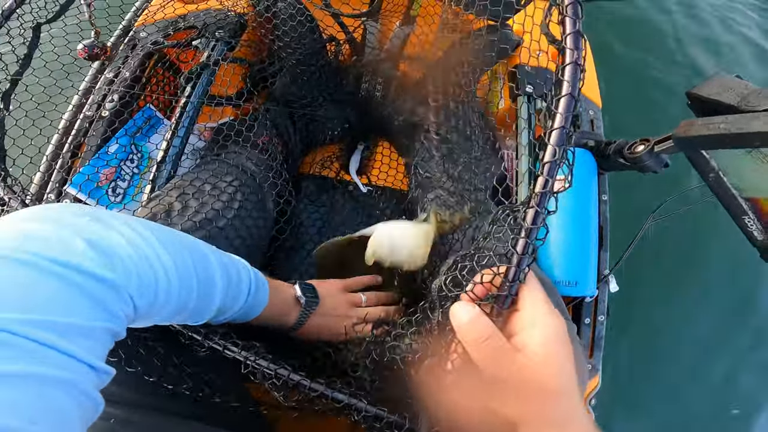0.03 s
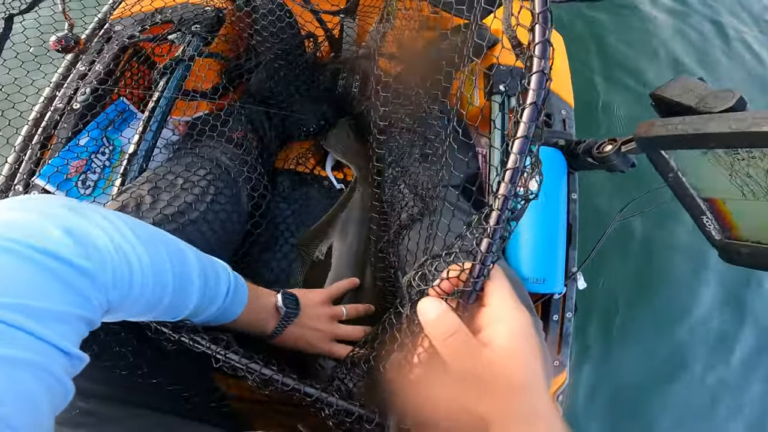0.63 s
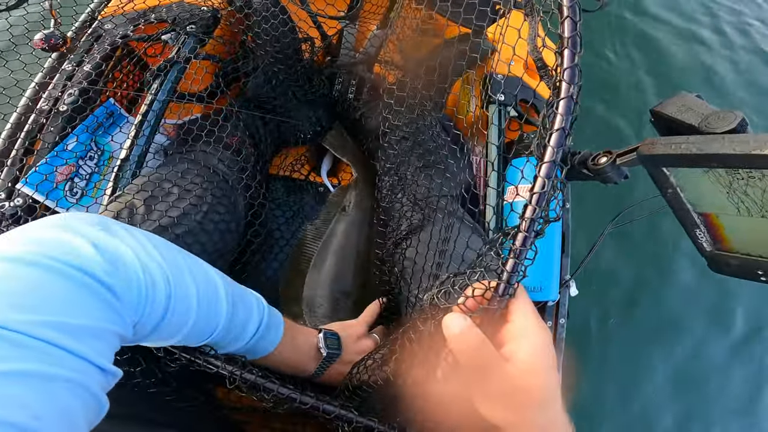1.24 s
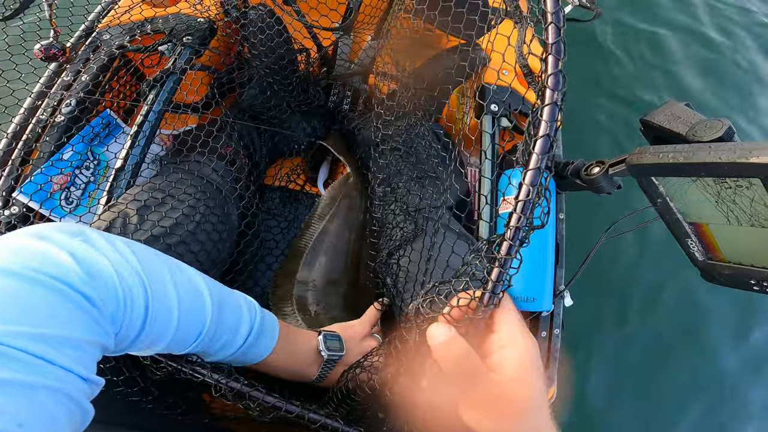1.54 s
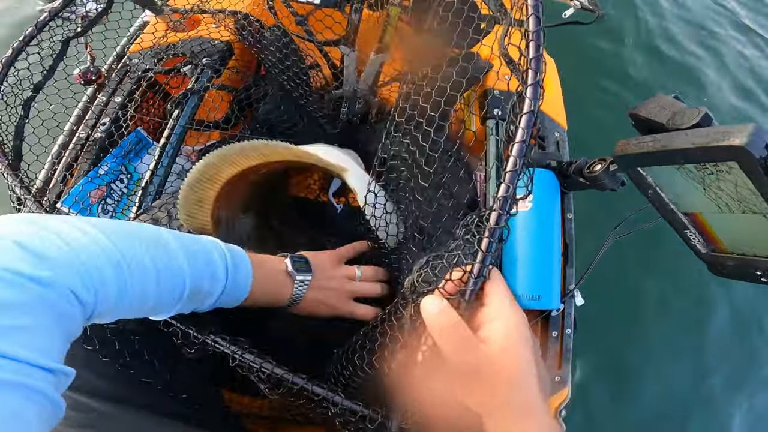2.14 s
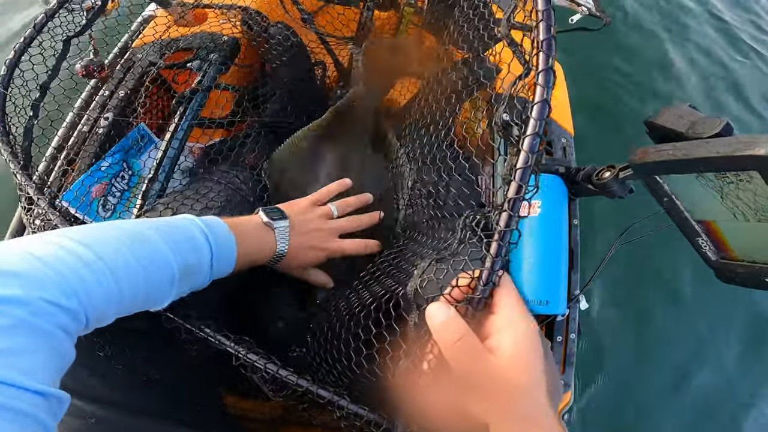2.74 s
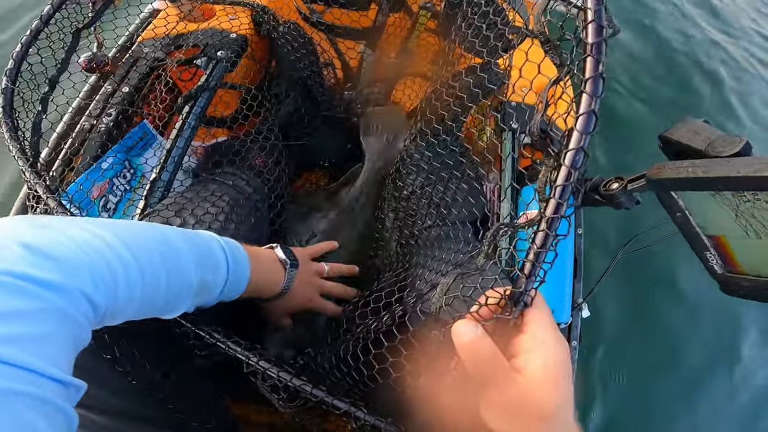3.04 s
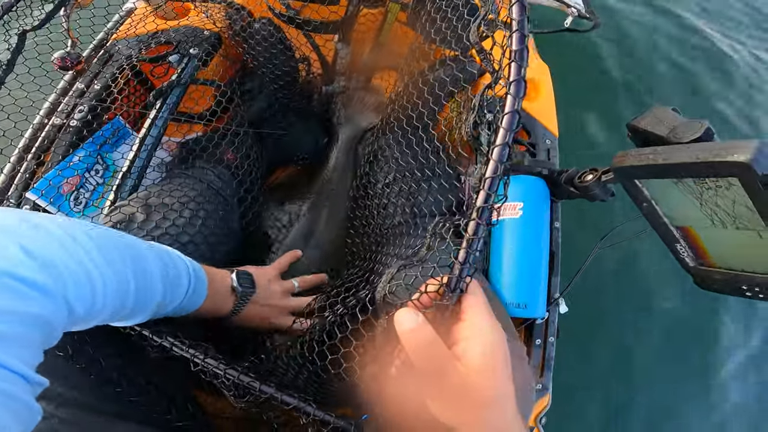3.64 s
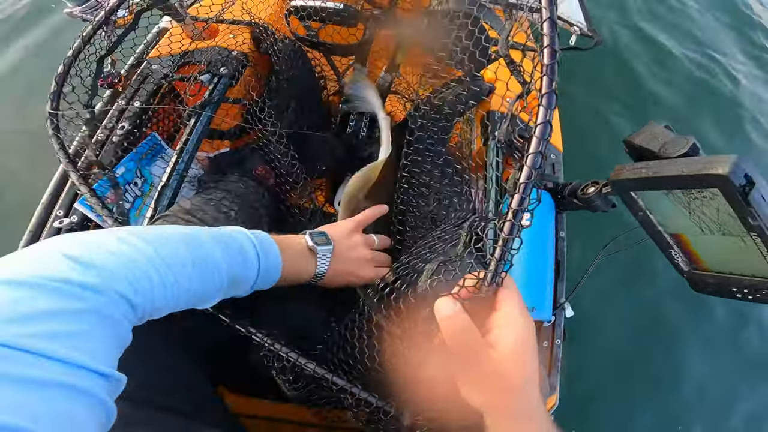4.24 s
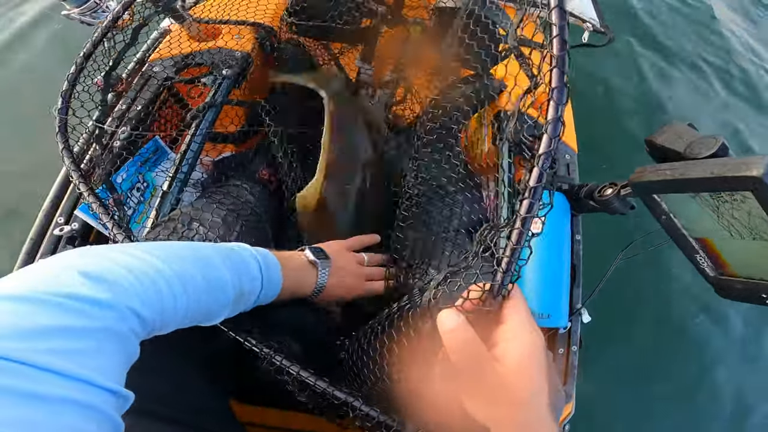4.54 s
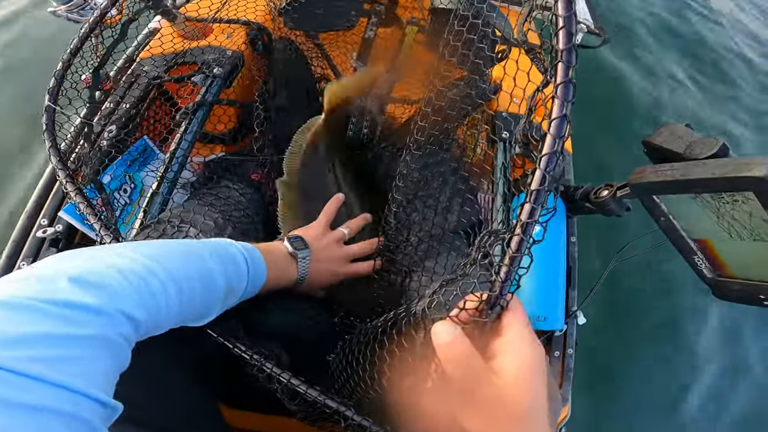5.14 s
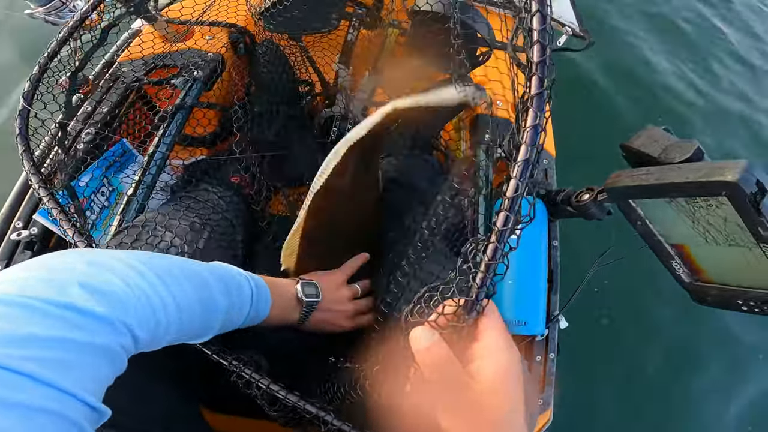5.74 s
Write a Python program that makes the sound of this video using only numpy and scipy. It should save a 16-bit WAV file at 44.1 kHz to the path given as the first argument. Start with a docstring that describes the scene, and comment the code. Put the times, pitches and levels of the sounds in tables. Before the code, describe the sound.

A large wet fish thrashes in a net on a plastic kayak, slapping and thumping in bouts over a low engine hum.

```python
"""On the deck of a plastic kayak, an arm's length away, a big flatfish thrashes in a landing net.
Its wet skin slaps and throws spray, air pockets in the slime resonate as pops and squelches, and its
body drives the damped modes of the hollow hull. The dragged mesh rustles by stick-slip friction.
Underneath, an engine hums across the water, with a low wash around the boat and a light breeze."""
import sys
import numpy as np
from scipy import signal
from scipy.fft import rfft, irfft
from scipy.io import wavfile
from scipy.ndimage import map_coordinates

SR = 44100
rng = np.random.default_rng(int(sys.argv[2]) if len(sys.argv) > 2 else 0)


def to_wav(s):
    """Save 16-bit WAV."""
    ch = np.atleast_2d(s).T  # columns
    pcm = np.round(np.clip(ch, -1, 1) * 32767)  # PCM
    wavfile.write(sys.argv[1], SR, pcm.astype(np.int16))


N = 255339
T = np.arange(N) / SR

# Gusts on the microphone ports. Each row: crest in seconds, half-width in seconds, level in dB.
GUSTS = [(0.288, 0.73, -34), (4.313, 0.97, -45), (5.8, 0.37, -35)]
# Spectrum of the wash around the hull. Each row: frequency in Hz, relative level in dB.
WASH_SPECTRUM = [(12, -14), (22, 2), (60, 4), (80, 1), (120, 0.5), (160, -2.5), (205, -3), (285, -13.5),
                 (350, -19), (550, -26.5), (1000, -31.5), (2000, -47.5), (5000, -82.5), (9000, -73.5),
                 (15000, -80)]
# Course of the lapping. Each row: time in seconds, relative level in dB.
LAPPING_LEVELS = [(0.0, -46.5), (0.6, -62), (1.45, -61), (2.06, -39.5), (2.58, -60), (3.87, -47.5),
                  (4.22, -38), (5.22, -62), (5.79, -40)]
# Partials of the engine. Each row: frequency in Hz, rms level in dB before waver and swell.
ENGINE_PARTIALS = [(92.8, -35), (187.5, -40), (211, -43.5), (273, -51), (370, -61), (398, -64), (457, -59),
                   (492, -67), (523, -63), (565, -68), (665, -68)]
# Swell of the upper partials: crest in seconds, half-width in seconds, gain in dB.
ENGINE_SWELL = (3.6, 0.43, 7.4)
# Glides of skin under the mesh. Each row: crest in seconds, half-width in seconds, level in dB.
GLIDES = [(0.81, 0.091, -62), (3.86, 0.23, -54)]
# Slow sliding of the fish in the mesh. Each row: time in seconds, level in dB.
SLIDING_LEVELS = [(0.0, -43.5), (0.31, -59), (0.53, -62), (1.16, -73.5), (1.4, -68.5), (1.61, -57.5),
                  (1.8, -58.5), (1.95, -35.5), (2.11, -57.5), (2.35, -46.5), (2.55, -59.5), (2.93, -53.5),
                  (3.08, -75), (3.4, -69.5), (3.6, -60.5), (3.9, -57), (4.03, -44), (4.18, -41.5),
                  (4.71, -49.5), (4.89, -56), (5.3, -62), (5.55, -52), (5.79, -37.5)]
# Hauls on the mesh. Each row: end of the rise in seconds, hold in seconds, rustle in dB, scrape in dB.
SWISHES = [(0.031, 0.045, -36.5, -43.5), (0.149, 0.028, -36, -35), (.25, 0.0084, -44, -56),
           (.42, 0.082, -54, -58), (1.501, 0.013, -65, -44.5), (1.751, 0.089, -80, -39.5),
           (1.885, 0.03, -47, -59), (1.99, 0.091, -47, -37.5), (2.203, 0.032, -42, -36.5),
           (2.434, 0.029, -43, -32.5), (2.743, 0.051, -51.5, -53), (3.556, 0.035, -60, -48.5),
           (3.635, 0.034, -62, -43), (4.022, 0.027, -32, -27), (4.124, 0.012, -31, -49),
           (4.29, 0.064, -37.5, -38.5), (4.48, 0.045, -38, -30.5), (4.6, .1, -36.5, -37.5),
           (4.785, 0.044, -45, -43), (4.951, 0.037, -47.5, -51), (5.417, 0.0038, -58, -47),
           (5.489, 0.027, -47, -38.5), (5.629, 0.0096, -38, -36), (5.665, 0.091, -43, -40.5)]
# Spectra of gliding skin, mesh, spray and flesh. Each row: frequency in Hz, relative level in dB.
GLIDE_SPECTRUM = [(600, -5.5), (1600, 6.5), (2600, -12), (3500, 1.5), (5200, -1), (7000, -24), (9000, -24),
                  (12500, -27), (15000, -44.5)]
MESH_SPECTRUM = [(820, -18.5), (1250, 11), (1600, 2), (2100, 7), (2720, 9.5), (3570, 0), (5670, -0.5),
                 (7440, -7), (8910, -15), (10500, -10.5), (13700, -26.5), (15500, -41)]
SPRAY_SPECTRUM = [(710, -5), (1250, -8), (1600, -9.5), (2050, -6.5), (2510, -7.5), (4530, -8.5), (5790, -4),
                  (6370, -9), (7810, -7), (8330, -15), (10300, -12), (13800, -27), (15500, -40.5)]
FLESH_SPECTRUM = [(200, -20.5), (400, 3.5), (580, -1), (750, 0.5), (1100, -2), (1500, -13.5), (2500, -42)]
# Squelches of slime. Each row: start in seconds, length in seconds, centre pitch in Hz, peak in dB.
SQUELCHES = [(0.247, 0.046, 1064, -24), (0.298, .02, 2190, -32), (0.411, 0.049, 1490, -27.5),
             (0.459, 0.024, 1063, -27.5), (0.623, 0.016, 1155, -41.5), (1.746, 0.047, 1100, -31),
             (1.78, 0.018, 862, -21), (3.637, 0.033, 924, -32.5), (4.089, 0.019, 1230, -27),
             (4.753, 0.031, 1210, -29), (4.867, 0.027, 1110, -28.5), (5.022, 0.017, 1547, -32.5),
             (5.046, 0.026, 945, -31), (5.197, 0.033, 1350, -31), (5.245, 0.023, 1150, -29.5),
             (5.412, 0.017, 825, -25.5), (5.452, 0.022, 1222, -28)]
# Bubbles popping in the slime. Each row: start in seconds, pitch in Hz, peak in dB, t60 in seconds.
POPS = [(.035, 750, -19, 0.014), (0.141, 2490, -11.5, 0.0079), (.142, 3670, -13, 0.0056),
        (0.489, 6100, -23.5, 0.00092), (.615, 3600, -50, 0.0015), (.634, 2600, -54, 0.0027),
        (.808, 4240, -48.5, 0.0015), (.92, 4000, -50, 0.0019), (1.288, 3050, -47.5, 0.008),
        (1.323, 5230, -48.5, 0.0038), (1.359, 3000, -41.5, 0.0039), (1.455, 3040, -41, .011),
        (1.49, 2880, -49, .008), (1.504, 1030, -37.5, 0.012), (1.53, 3480, -48, .007),
        (1.668, 4700, -36.5, 0.0036), (1.792, 2700, -30, 0.0079), (1.874, 814, -18, 0.017),
        (1.973, 1150, -13.5, 0.012), (2.257, 2610, -15.5, 0.0032), (2.259, 780, -14.5, 0.029),
        (2.293, 2600, -31, .007), (2.424, 3960, -19, 0.0089), (2.52, 1230, -22, 0.0089),
        (2.521, 2380, -21, 0.0069), (2.839, 1090, -22, 0.015), (2.847, 2720, -15.5, 0.0098),
        (2.848, 3210, -17, 0.012), (2.947, 1270, -24, 0.012), (3.023, 2110, -40, 0.013),
        (3.076, 5940, -34, 0.01), (3.601, 3100, -47, .007), (3.727, 980, -27.5, .022),
        (4.010, 2600, -21.5, 0.016), (4.012, 1940, -16.5, 0.018), (4.041, 795, -26, 0.06),
        (4.125, 766, -15, 0.034), (4.165, 2400, -31, .01), (4.201, 930, -18.5, 0.0078),
        (4.233, 800, -24, .025), (4.274, 704, -29, .03), (4.508, 1140, -23, 0.044), (4.579, 1210, -18, .04),
        (4.591, 1970, -21.5, .03), (4.594, 795, -31, .025), (4.641, 1650, -26, .014),
        (4.659, 1770, -25, .014), (4.82, 1375, -23.5, 0.018), (4.936, 1410, -27.5, 0.0071),
        (5.133, 535, -22, 0.023), (5.139, 4030, -26.5, .002), (5.338, 2680, -34, .004),
        (5.63, 5400, -21.5, 0.0045), (5.631, 1120, -29, 0.021), (5.657, 1050, -24, .03),
        (5.677, 850, -33, .025), (5.707, 1400, -21, 0.0098), (5.749, 2590, -29, .014)]
# Lowest mode of the deck: frequency in Hz, t60 (the time to decay by 60 dB) in seconds.
DECK_MODE = (73.4, 0.26)
# Modes of the hull. Each row: frequency in Hz, t60 in seconds, relative level in dB.
HULL_MODES = [(128.6, 0.29, -0.5), (188.6, 0.027, 0), (258, 0.027, 7.5), (313, 0.039, 2), (382.6, 0.034, 2),
              (472, 0.053, 1), (534, 0.01, -8.5), (768, 0.019, 2.5), (1013, 0.018, -21),
              (1180, 0.018, -5.5)]
# Blows of the body. Each row: start in seconds, boom peak in dB, knock peak in dB, pitch of the struck
# spot in Hz, contact time in seconds, t60 of the damping by the body in seconds.
THUMPS = [(0.034, -21, -16, 720, 0.0025, 0.12), (0.146, -8.5, -18, 131, 0.0019, .4),
          (0.171, -45, -16.5, 328, 0.0018, 0.14), (0.249, -18, -14.5, 133, 0.0028, 0.16),
          (0.332, -22, -18.5, 298, 0.0019, 0.08), (0.57, -28, -15.5, 268, 0.0021, 0.074),
          (1.8752, -45, -7, 526, 0.0016, 0.057), (1.885, -23, -11.5, 258, 0.0018, 0.076),
          (1.978, -10.5, 3, 330, 0.0016, 0.16), (2, -30, -2.5, 480, 0.00094, 0.14),
          (2.191, -11.5, -9.5, 292, 0.0031, 0.19), (2.2617, -36, -4.5, 245, 0.0022, 0.069),
          (2.4274, -13.5, -3.5, 201, 0.0031, 0.089), (2.454, -16.5, -7.5, 149, 0.0027, 0.21),
          (2.544, -38, -16, 338, 0.0014, 0.17), (2.837, -15, -10, 129, 0.003, 0.17),
          (2.852, -40, -26, 340, 0.002, 0.14), (2.909, -14.5, -23.5, 132, 0.0046, 0.35),
          (4.023, -50, -8.5, 164, 0.0029, 0.055), (4.137, -12, -6, 300, 0.0013, .04),
          (4.205, -12.5, -2.5, 203, 0.0017, 0.11), (4.218, -38, -6, 300, 0.0018, 0.091),
          (4.276, -28, -11, 345, 0.0012, 0.17), (4.4652, -15, 1, 201, 0.0026, 0.15),
          (4.473, -30, -6, 430, 0.0014, .09), (4.5, -45, -16.5, 240, 0.0022, 0.1),
          (4.593, -27, -21, 200, 0.0022, 0.14), (4.6481, -11.5, -1.5, 240, 0.0038, 0.12),
          (4.66, -43, -14, 524, 0.00088, 0.1), (4.939, -25, -24, 140, 0.0032, 0.27),
          (5.132, -52, -15, 340, 0.001, .4), (5.452, -20, -13.5, 486, 0.00094, 0.13),
          (5.655, -28, -13.5, 150, 0.0019, .15), (5.7124, -14.5, -1, 170, 0.0028, 0.15)]
# Slaps of fins and tail. Each row: time in seconds, level in dB, smack relative to the spray in dB,
# gain of the top treble in dB, t60 in seconds, time constant of the rise in seconds.
SLAPS = [(.022, -28.5, 0, -14, 0.042, 0.0052), (.036, -25.5, 0, -1, 0.054, 0.0022),
         (.048, -28, -30, -3, 0.074, 0.0046), (.143, -16, -39, -9.5, 0.031, 0.0046),
         (0.259, -37, -8, -6, 0.14, 0.004), (.31, -43.5, -23.5, -33, 0.21, .002),
         (0.434, -54, -16, -25, 0.065, 0.0046), (.541, -49, 5.5, -8, 0.1, 0.0024),
         (1.457, -52, -5, -7, 0.039, 0.0011), (1.507, -54, -1, -2, 0.028, .002),
         (1.608, -48.5, 0, -12, .02, .003), (1.668, -50.5, 8, -9, 0.081, 0.0047),
         (1.782, -34, -6, -13, 0.083, 0.004), (1.793, -35, 3, -12, 0.058, 0.0018),
         (1.844, -36.5, -6, -20, 0.077, 0.014), (1.876, -23, 4, -16, 0.04, 0.0065),
         (1.917, -36, 6, 0, 0.036, 0.0025), (1.975, -31.5, 14.5, -34, 0.13, 0.0019),
         (1.995, -24.5, -24, -18, 0.21, 0.0054), (2.109, -38.5, -10, -20, 0.086, 0.0052),
         (2.193, -43, 13, -19, 0.045, .0008), (2.259, -24, -12, -15.5, 0.022, 0.0077),
         (2.295, -34, -15, -20, 0.015, 0.0022), (2.321, -35, -18, -20, 0.009, .0008),
         (2.348, -37.5, 5.5, -17, .026, 0.0041), (2.385, -38.5, -5, -19, 0.02, 0.0023),
         (2.424, -22, -0.5, -16, 0.045, 0.0038), (2.519, -32.5, 4, -17, 0.037, 0.0027),
         (2.747, -40.5, -20, -12, .015, 0.0023), (2.762, -42, -14, -23, 0.054, 0.0033),
         (2.8382, -28.5, -32, -23, 0.073, 0.0036), (2.849, -31.5, -25, -13, 0.018, 0.0018),
         (2.908, -44, -10, -33, .04, .004), (2.9488, -29, -23, -32, 0.0086, 0.0016),
         (3.026, -43, 2.5, -18, 0.07, 0.0028), (3.075, -43.5, -35, -21.5, 0.068, 0.002),
         (3.56, -45.5, -3, -12.5, 0.013, 0.0011), (3.57, -49.5, -3, 0, .015, .001),
         (3.601, -49.5, -8, 0, .02, .001), (3.648, -49, 6, 8, 0.033, .002),
         (3.691, -47, 14.5, -9, 0.049, 0.0033), (4.0118, -22, -5, -9.5, 0.04, 0.0052),
         (4.025, -18.5, -27, -5, 0.021, 0.00053), (4.042, -32.5, 13, -18, 0.052, 0.00065),
         (4.067, -36, -17, 10, .012, .001), (4.128, -25, 8.5, -35, 0.052, 0.0099),
         (4.138, -21.5, -2, -7.5, 0.016, 0.0016), (4.166, -33.5, -8, -11, 0.034, .002),
         (4.216, -27, 4.5, -16, 0.038, .001), (4.234, -30, 4.5, -20, 0.037, 0.0017),
         (4.277, -16.5, -2, -5.5, 0.036, 0.0048), (4.291, -24.5, 1, -9, 0.095, 0.00092),
         (4.4622, -15.5, -4.5, -11, 0.022, 0.00075), (4.477, -25, -10, -18, 0.13, 0.007),
         (4.499, -25, -12, -31, 0.022, 0.0012), (4.511, -26, -8, -20, 0.018, 0.00072),
         (4.582, -24, -18, -7.5, 0.12, 0.0032), (4.596, -24.5, 0, -13, 0.016, .002),
         (4.642, -21, -8, -19, 0.035, 0.00055), (4.662, -26, -5, -19, 0.049, 0.0015),
         (4.68, -30, -2, -9, 0.053, 0.001), (4.766, -31, -3.5, -14, 0.036, 0.0033),
         (4.821, -27.5, -9, -14, 0.071, 0.0018), (4.881, -39, -18, -9, 0.047, 0.0014),
         (4.9387, -32.5, -28, -17, 0.016, 0.00056), (4.969, -31.5, -15, -9, 0.013, 0.0034),
         (5.035, -39.5, -7, -60, 0.063, 0.0022), (5.105, -39, -21, -24, 0.073, 0.0045),
         (5.14, -29.5, 5.5, -14, 0.049, 0.0032), (5.199, -32, 0.5, -11, 0.082, 0.0038),
         (5.252, -44, -11, -12, 0.051, 0.0016), (5.289, -42.5, -17, -17, 0.027, .001),
         (5.336, -46, -25, -20, .011, .0007), (5.396, -46, -15, -4, .02, .001),
         (5.458, -28.5, 4, -18, 0.037, 0.002), (5.515, -32.5, -4, -12, .025, 0.0028),
         (5.638, -20, -21, -4.5, 0.025, 0.0016), (5.6571, -23.5, -7, -6, 0.05, 0.0005),
         (5.678, -27.5, -16, -7, 0.14, 0.013), (5.737, -28, -26, -10, 0.2, 0.0022)]
# Left-right spread. Each row: frequency in Hz, side signal relative to mid in dB, before STEREO_WIDTH.
SIDE_SPECTRUM = [(100, -36), (250, -23), (900, -25), (1500, -11), (2500, -17), (7000, -18), (10000, -13),
                 (13000, -1)]
# Width of the stereo image. Each row: time in seconds, gain of the side signal in dB.
STEREO_WIDTH = [(0, 1), (.6, -2.5), (1.2, -17), (1.5, -27.5), (3.25, -32), (3.45, -4), (4.3, -1.5),
                (5.79, 2)]
# Spectra of wind, lapping, mesh hiss and settling flesh. Each row: frequency in Hz, relative level in dB.
WIND_SPECTRUM = [(15, -12), (35, 7.5), (70, 3.5), (150, 1.5), (400, -14.5), (1000, -34.5), (3000, -68.5)]
LAPPING_SPECTRUM = [(100, -28), (250, 5.5), (450, -4.5), (900, -24.5), (2500, -73)]
HISS_SPECTRUM = [(1150, 0), (1600, -7.5), (2500, -7), (4200, -5), (7000, -11.5), (12000, -19),
                 (15500, -43)]
SETTLING_SPECTRUM = [(60, -12), (200, 9), (500, 6), (1200, -11.5), (3000, -59.5)]


def undb(db):
    """Amplitude grows tenfold for every 20 dB."""
    return 10 ** (np.asarray(db) / 20)


def unit(x):
    """Normalisation to an rms of 1."""
    return x / np.sqrt(np.mean(x ** 2) + 1e-20)


def at_peak(x, db):
    """Normalisation to a peak level in dB."""
    return undb(db) * x / np.abs(x).max()


def add(track, start, x):
    """Superposition: x joins the track at start seconds."""
    i = int(start * SR)
    x = x[max(-i, 0):N - i]
    track[max(i, 0):i + len(x) + max(-i, 0)] += x


def decay(t, t60):
    """Exponential damping by 60 dB in t60 seconds."""
    return np.exp(-np.log(1000) * t / t60)


def bell(crest, half_width):
    """A Gaussian swell, down to 1/e at half_width seconds from its crest."""
    return np.exp(-((T - crest) / half_width) ** 2)


def gain_curve(levels):
    """Gain interpolated in decibels between (seconds, dB) points."""
    return undb(np.interp(T, *np.transpose(levels)))


def walk(rate):
    """Smooth random modulation with about rate turns a second and a spread near 1."""
    turns = rng.standard_normal(size=1024)
    coarse = T[::32]
    return np.interp(T, coarse, map_coordinates(turns, [coarse * rate], order=3, mode="wrap"))


def colour(x, spectrum, size=1024):
    """Minimum-phase filtering to a spectrum of (Hz, dB) points."""
    hz, db = np.transpose(spectrum)
    log_hz = np.log(np.fft.rfftfreq(size, 1 / SR) + 1)
    log_gain = np.log(undb(np.interp(log_hz, np.log(hz), db)))
    cepstrum = irfft(log_gain)[:size // 2]
    cepstrum[1:] *= 2
    return signal.fftconvolve(x, irfft(np.exp(rfft(cepstrum, size))))[:len(x)]


def noise(spectrum, size=1024):
    """Gaussian noise filtered to a spectrum, at an rms of 1."""
    return unit(colour(rng.standard_normal(N), spectrum, size))


def ring(force, hz, t60):
    """Forced response of one damped mode."""
    pole = np.exp((2j * np.pi * hz - np.log(1000) / t60) / SR)
    return signal.lfilter([1], [1, -pole], force).imag


def band(x, hz, q):
    """Second-order resonance with a gain of 1 at its centre."""
    return signal.lfilter(*signal.iirpeak(min(hz, SR / 3), max(q, 1), fs=SR), x)


def crackle(rate, spread_db):
    """Shot noise: rate clicks a second, of random sign and with sizes scattered in dB."""
    out = np.zeros(N)
    place, sign, size = rng.random((3, N // 4))[:, :int(rate * N / SR)]
    size_db = spread_db * np.clip(.6 * np.log((size + 1e-9) / (1 - size)), -2, 2)
    out[(place * N).astype(int)] = np.sign(sign - .5) * undb(size_db)
    return unit(out)


def droplets(rate, spread_db, q, ticks):
    """Bursting water films act as impulses: broadband ticks among short resonant grains."""
    grains = sum(band(crackle(rate / 10, spread_db), hz, q) for hz in np.geomspace(600, 14000, 16))
    return unit(unit(grains) + ticks * crackle(rate, spread_db))


def breeze():
    """Turbulent pressure in the gusts drives the two microphone ports in antiphase."""
    gusts = sum(undb(db) * bell(crest, half_width) for crest, half_width, db in GUSTS)
    return np.outer([1, -1], noise(WIND_SPECTRUM, size=4096) * gusts)


def water(wash_db=-31.5, lapping_gain_db=7):
    """Moving water radiates low noise: wash and lapping share one slow amplitude modulation."""
    surge = undb(1.5 * walk(rate=6))
    wash = noise(WASH_SPECTRUM, size=8192) * undb(wash_db)
    lapping = noise(LAPPING_SPECTRUM) * gain_curve(LAPPING_LEVELS) * undb(lapping_gain_db)
    return surge * (wash + lapping)


def engine(swell_above_hz=380):
    """Propagation over water modulates each partial in pitch and level; the upper ones swell once."""
    out = np.zeros(N)
    crest, half_width, swell_db = ENGINE_SWELL
    for hz, db in ENGINE_PARTIALS:
        pitch = hz * (1 + .00577 * walk(rate=4.9))
        level_db = db + min(hz / 110, 2.5) * walk(rate=4)
        if hz > swell_above_hz:
            level_db += swell_db * bell(crest, half_width)
        out += np.sqrt(2) * undb(level_db) * np.sin(2 * np.pi * np.cumsum(pitch) / SR)
    return out


def glides():
    """Sliding friction of wet skin under the mesh makes a fine hiss that swells and fades."""
    swell = sum(undb(db) * bell(crest, half_width) for crest, half_width, db in GLIDES)
    return noise(GLIDE_SPECTRUM) * swell * undb(1.2 * walk(rate=25))


def knots(per_second=230, low_hz=950, high_hz=6500, spread_db=3.1):
    """Impulse excitation: each knot that snaps free flicks a drop, which rings at its own pitch."""
    out, t = np.zeros(N), T[:SR // 30]
    for when, pitch, life, size in rng.random((int(per_second * N / SR), 4)):
        hz = low_hz * (high_hz / low_hz) ** pitch
        cycles = 22 * 2 ** (2 * life - 1)
        size_db = spread_db * min(-np.log(1 - size), 3)
        drop = np.sin(2 * np.pi * hz * t) * decay(t, cycles / hz)
        add(out, when * N / SR, undb(size_db) * np.sqrt(hz / cycles) * drop)
    return unit(out)


def pull(attack_s=.019, release_s=.0063):
    """Friction envelopes of rustle and scrape: slow sliding, plus swishes that die as the mesh tautens."""
    rustle = gain_curve(SLIDING_LEVELS)
    scrape = rustle * undb(-1)
    t = T[:SR // 2] - attack_s
    for time, hold, rustle_db, scrape_db in SWISHES:
        envelope = np.minimum(1 + t / attack_s, 1) * np.exp(-np.maximum(t - hold, 0) / release_s)
        add(rustle, time - attack_s, undb(rustle_db) * envelope)
        add(scrape, time - attack_s, undb(scrape_db) * envelope)
    return rustle, scrape


def net(knots_db=-4):
    """Stick-slip friction: wet mesh hisses as it slides and, pulled harder, catches in uneven tugs."""
    rustle_gain, scrape_gain = pull()
    catching = np.clip((20 * np.log10(rustle_gain) + 76) / 24, .6, .97)
    tugs_db = 3.5 * catching * walk(rate=130)
    strands = unit(colour(droplets(rate=4500, spread_db=5, q=8, ticks=.9), MESH_SPECTRUM))
    hiss = noise(HISS_SPECTRUM)
    rustle = unit(catching * strands + np.sqrt(1 - catching ** 2) * hiss + undb(knots_db) * knots())
    scrape = unit(colour(crackle(rate=1600, spread_db=6.5), FLESH_SPECTRUM))
    return undb(tugs_db) * (rustle * rustle_gain + scrape * scrape_gain)


def squelches(t60=.011, rise_octaves=.15, wobble_octaves=.12):
    """Cavity resonance: tiny bubbles in squeezed slime ring a pocket whose pitch rises as it shrinks."""
    out, t = np.zeros(N), T[:SR // 5]
    bubbles = signal.lfilter([1], [1, -decay(1 / SR, t60)], crackle(rate=450, spread_db=4))
    wobble = wobble_octaves * walk(rate=110)
    for (start, length, hz, db), place in zip(SQUELCHES, rng.random(len(SQUELCHES))):
        i = int(place * (N - len(t)))
        progress = np.minimum(t / length, 1)
        pitch = hz * 2 ** (rise_octaves * (progress - .5) + wobble[i:i + len(t)])
        envelope = np.sin(np.pi * progress) * bubbles[i:i + len(t)]
        gurgle = envelope * np.sin(2 * np.pi * np.cumsum(pitch) / SR)
        add(out, start, at_peak(gurgle, db))
    return out


def pops(tear_s=.004):
    """Bubble resonance: a tearing film gives a brief noise that rings the air behind it."""
    out, t = np.zeros(N), T[:SR // 10]
    for start, hz, db, t60 in POPS:
        tear = rng.standard_normal(len(t)) * np.exp(-t / tear_s)
        bubble = band(band(tear, hz, q=1), hz, q=np.pi * hz * t60 / np.log(1000))
        add(out, start, at_peak(bubble, db))
    return out


def thumps(settle_s=.43, settle_doubling_db=38, cup_db=8, cup_t60=.06):
    """Modal excitation by impact: the body lands and settles, so the hull knocks and the deck booms."""
    out, t = np.zeros(N), T[:SR // 2]
    patter = crackle(rate=1500, spread_db=8.5)
    offsets = rng.integers(0, N - len(t), len(THUMPS))
    weight = np.sin(np.pi * np.minimum(t / .0008, 1))  # the pulse that bends the deck
    boom = ring(weight, *DECK_MODE)
    for (start, boom_db, knock_db, spot_hz, contact_s, damping_t60), i in zip(THUMPS, offsets):
        push = np.sin(np.pi * np.minimum(t / max(contact_s, .001), 1))
        settle_t60 = settle_s * 2 ** (knock_db / settle_doubling_db)  # longer after a harder blow
        settling = colour(patter[i:i + len(t)] * decay(t, settle_t60), SETTLING_SPECTRUM)
        force = push / push.sum() + .23 * settling / np.linalg.norm(settling)
        knock = undb(cup_db) * ring(force, spot_hz, cup_t60)  # air cupped under the body
        for hz, t60, db in HULL_MODES:
            # a spot drives most strongly the modes that move most there
            coupling_db = 5.6 * np.exp(-(np.log2(hz / spot_hz) / 2.1) ** 2)
            knock += undb(db + coupling_db) * ring(force, hz, t60)
        knock *= decay(t, damping_t60)  # the weight of the fish smothers the ring
        add(out, start, at_peak(knock, knock_db))
        add(out, start - .003, at_peak(boom, boom_db))
    # a small hull radiates nothing of the slow push itself
    return signal.sosfilt(signal.butter(2, 50, "high", fs=SR, output="sos"), out)


def slap_envelope(t, db, t60, rise_s):
    """Impact transient: the contact spreads, closes with a crack at t = 0 and decays as drops fall."""
    before, after = np.minimum(t, 0), np.maximum(t, 0)
    crack = .49 * 2 ** (db / 7.5) * np.exp(-np.abs(t) / .00073)  # halved for a slap 7.5 dB lighter
    drops = undb(-19.5) * np.exp(-after / .051)
    return np.exp(before / rise_s) * (decay(after, t60) + crack + drops)


def spray(burst, treble_db, pocket_hz, gap_hz):
    """Resonance colours a burst of drops: trapped air rings, and the gap they squirt through is bright."""
    spectrum = [(hz, db + treble_db * np.clip(np.log2(hz / 4000), 0, 1)) for hz, db in SPRAY_SPECTRUM]
    spatter = unit(colour(burst, spectrum))
    pocket = unit(band(band(burst, pocket_hz, q=2), pocket_hz, q=6))
    squirt = unit(band(spatter, gap_hz, q=7))
    return unit(spatter + undb(-18) * pocket + undb(-20) * squirt)


def slaps(lead_s=.025, wall_reflection=.35):
    """Impact of wet skin: bright spray and a dull smack of flesh, reflected early by the cockpit wall."""
    out, t = np.zeros((2, N)), T[:SR // 5] - lead_s
    wet = droplets(rate=7000, spread_db=0, q=1.6, ticks=1.68)
    flesh = noise(FLESH_SPECTRUM)
    for time, db, smack_db, treble_db, t60, rise_s in SLAPS:
        place, path, side, pocket, gap = rng.random(5)
        i = int(place * (N - len(t)))
        envelope = slap_envelope(t, db, t60, rise_s)
        pocket_hz = 1110 * 2 ** (.045 * (2 * pocket - 1))
        gap_hz = 4560 * 2 ** (.66 * (2 * gap - 1))
        smack = undb(smack_db) * unit(flesh[i:i + len(t)] * envelope)
        direct = spray(wet[i:i + len(t)] * envelope, treble_db, pocket_hz, gap_hz) + smack
        echo = wall_reflection * np.roll(direct, int(SR * (.0004 + .0015 * path)))
        slap = (direct + echo) * undb(db) * np.sqrt(np.mean(envelope ** 2))
        pan_db = 3 * (side - .5)
        for ear, sign in zip(out, (1, -1)):
            add(ear, time - lead_s, slap * undb(sign * pan_db / 2))
    return out


def stereo_spread(x, size=256):
    """Decorrelation: a faint, slowly shifting left-right spread, widest in the top treble."""
    random_phase = irfft(np.exp(2j * np.pi * rng.random((2, size // 2 + 1))))
    kernels = np.pad(random_phase, ((0, 0), (size // 4, 0)))
    first, second = (signal.fftconvolve(x.mean(axis=0), kernel)[:N] for kernel in kernels)
    angle = 2 * walk(rate=9)
    side = colour(first * np.cos(angle) + second * np.sin(angle), SIDE_SPECTRUM)
    return x + np.outer([1, -1], side)


def scene():
    """Superposition of all sources, the fish ahead; the image closes almost to mono and opens again."""
    fish = slaps() + pops() + squelches() + thumps() + net() + glides()
    mix = stereo_spread(fish + engine() + water()) + breeze()
    mid = mix.mean(axis=0)
    return mid + (mix - mid) * gain_curve(STEREO_WIDTH)


def record(dry, top_hz=15300):
    """Soft saturation and band limiting: the microphone rounds the highest peaks and cuts the top."""
    rounded = np.tanh(.68 * dry) / .86
    return signal.sosfilt(signal.ellip(8, .2, 70, top_hz, fs=SR, output="sos"), rounded)


dry = scene()
out = record(dry)
to_wav(out)
```